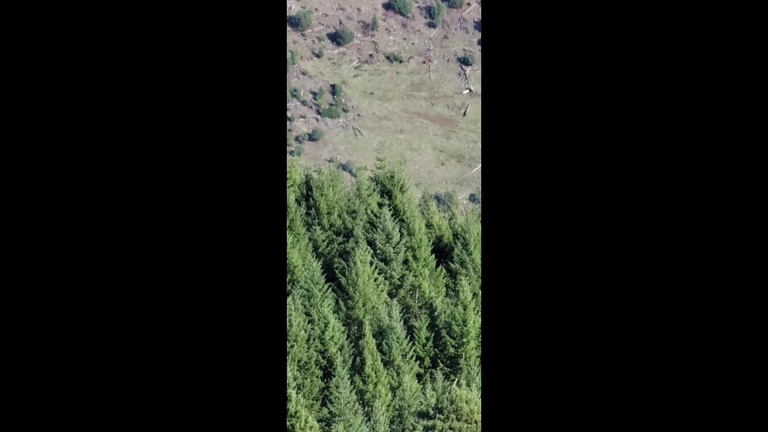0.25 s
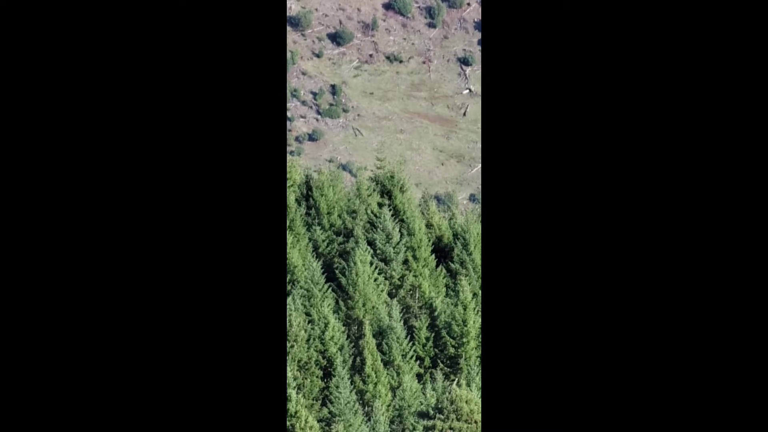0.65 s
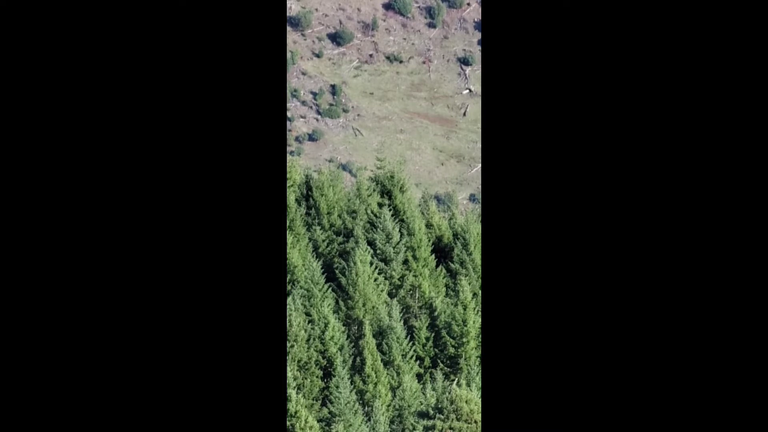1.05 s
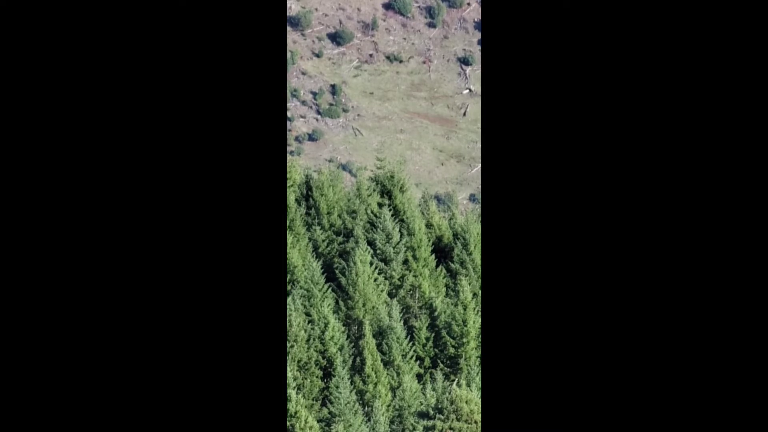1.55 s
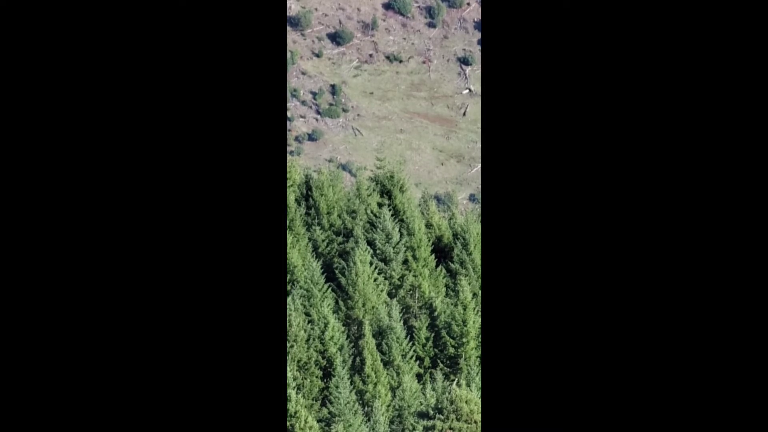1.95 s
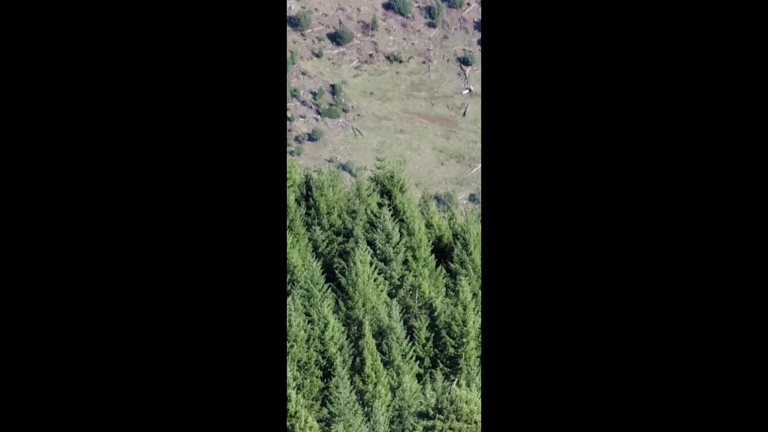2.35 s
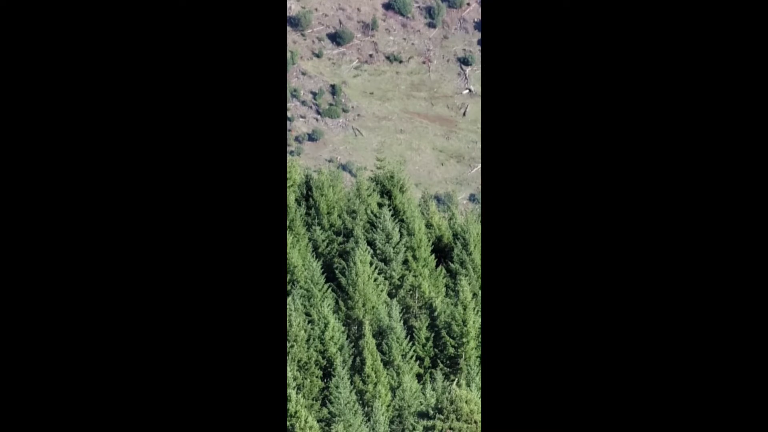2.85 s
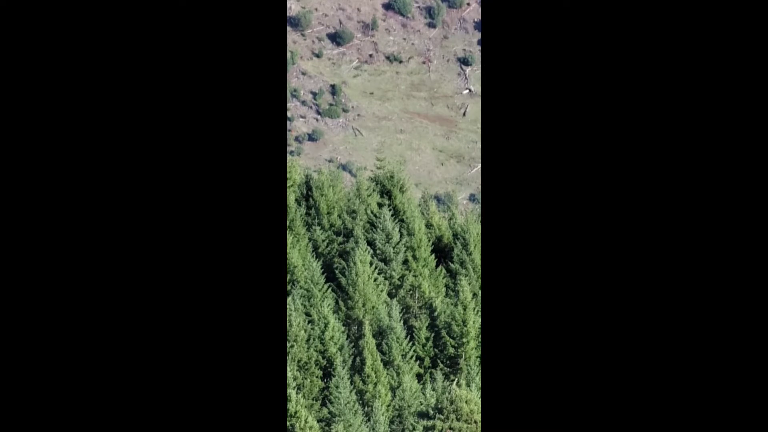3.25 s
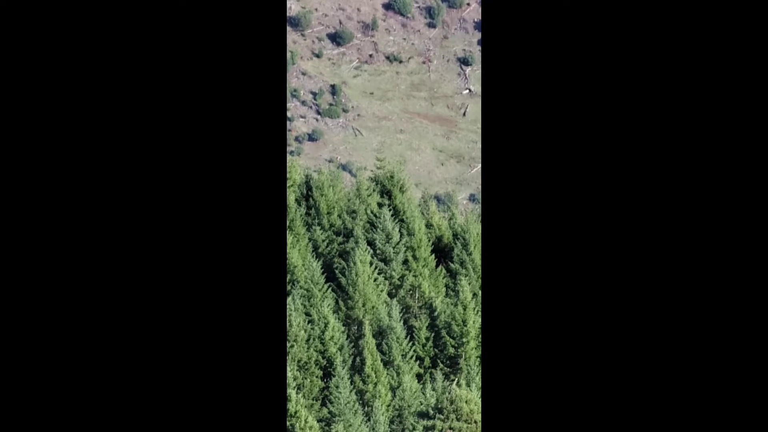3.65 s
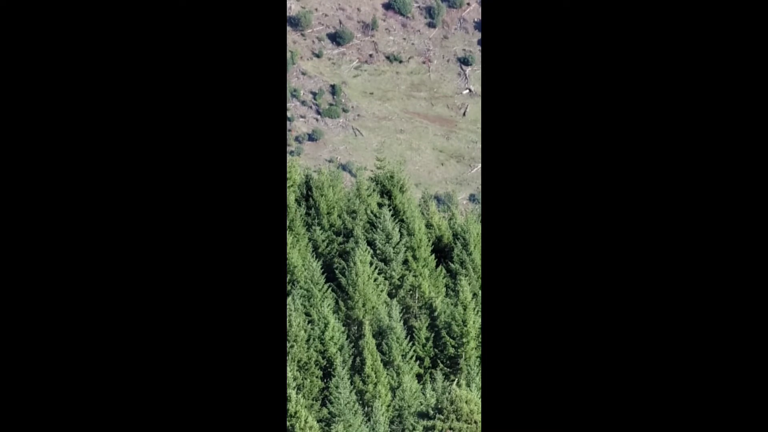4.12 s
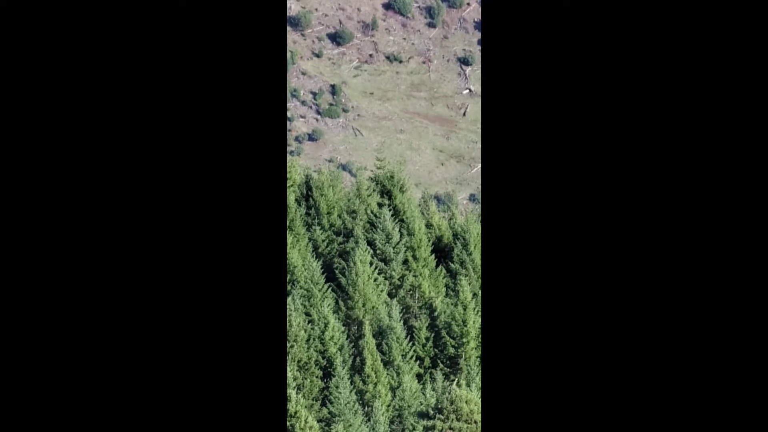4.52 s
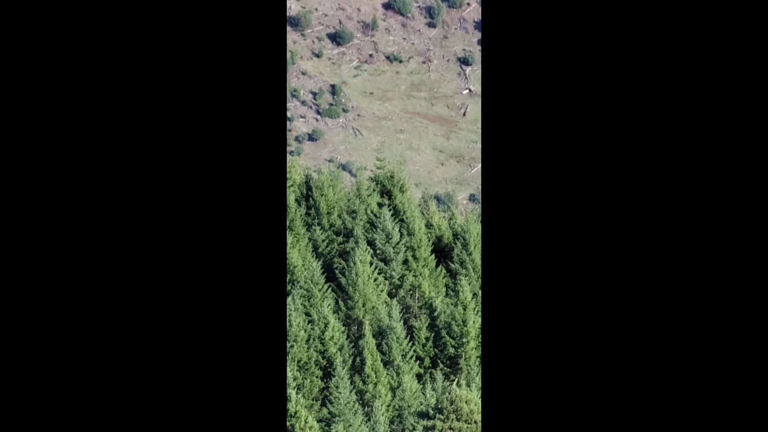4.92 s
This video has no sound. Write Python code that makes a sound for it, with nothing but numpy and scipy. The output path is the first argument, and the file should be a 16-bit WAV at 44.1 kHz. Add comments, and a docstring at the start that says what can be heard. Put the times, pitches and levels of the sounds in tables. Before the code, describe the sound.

For the first 1.7 seconds there is only very quiet valley air, a soft low rumble with faint hiss. At about 1.7 s a single rifle shot goes off close to the stereo microphones: a loud, rough, sizzling crack packed with dense pulses, low thumps and a deep push. Nearby ground and trees throw it back at once, with a second burst near 1.86-1.9 s, and the blast drops away by about 2.1 s. A grainy rolling echo takes over, with dull slaps around 2.3-2.5 s, smaller swells near 2.5 and 2.9 s, and a lull toward 3.5 s. From 3.7 s the far hillside answers more fully, a broad roar with sharper slaps clustered at 4.07-4.4 s, leaning slightly right. It grows duller and fades, with weak last slaps near 4.8-5.05 s. Barely audible dry ticks and thin rustling hiss sit close by after 4.1 s.

```python
"""Rifle shot above a wooded valley

One rifle shot close to the microphones: a rough blast of dense pulses with low thumps and a deep rumble,
thrown straight back by the nearest trees. Then countless trunks and slopes return it as a rolling echo of
scattered pulses, fullest from the far hillside, with single sharp slaps among it; the air dulls them with distance.
Close by, a faint rustle ticks and hisses late on, over the soft filtered noise of still air."""
import sys
import numpy as np
from scipy import signal
from scipy.fft import rfft, irfft, next_fast_len
from scipy.io import wavfile
from scipy.ndimage import uniform_filter1d

SR = 44100
rng = np.random.default_rng(int(sys.argv[2]) if len(sys.argv) > 2 else 0)


def transcribe(signal):
    """Save signal, clipped to [-1, 1], as a 16-bit WAV file at the path in sys.argv[1]."""
    frames = np.atleast_2d(signal).T
    limited = np.clip(frames, -1, 1)
    pcm = np.round(limited * 32767).astype(np.int16)
    wavfile.write(sys.argv[1], SR, pcm)


N = 228334
TIME = np.arange(N) / SR  # s
SIZE = next_fast_len(N)
BINS = np.maximum(np.arange(SIZE // 2 + 1) * SR / SIZE, 1)  # Hz
CENTRES = np.geomspace(25, 16000, 29)  # third octaves, Hz
SHOT_S = 1.707


# Colour of the report. Each row: frequency in Hz, relative level in dB.
REPORT_COLOUR = [(15, -51.5), (25, -6.5), (104, -5.5), (209, -4), (240, -6.5), (359, -7), (457, -13),
                 (537, -10), (970, -12), (1240, -15.5), (3000, -18.5), (4380, -20.5), (7910, -27.5),
                 (10900, -32.5), (15500, -27.5)]
# Narrow lifts in the report's uneven spectrum. Each row: frequency in Hz, width in Hz, lift in dB.
REPORT_LIFTS = [(109.7, 13, 5.5), (156.6, 14, 8.5), (205, 27, 4), (280, 9.1, 4.5), (353, 47, 4),
                (377, 16, 2), (671, 25, 1.5), (816, 53, 2), (975, 75.8, 5), (1860, 40.5, 3),
                (2780, 21.4, 9.5), (4840, 130, 4.5), (6460, 26, 2.5), (12900, 31, 4.5)]
# Left-right likeness of sounds close to the microphones. Each row: frequency in Hz, correlation (-1 to 1).
NEAR_LIKENESS = [(60, .65), (200, .75), (650, .76), (1400, .5), (3100, .15), (7000, .03), (15000, -.09)]
# The muzzle blast, then its returns from the ground close by, the nearest trees and the wood behind them.
# Each row: full at in seconds, hold in seconds, rise in dB per s, fall in dB per s before its share below,
# then boom, bark and crack levels in dB.
BURSTS = [(1.725, 0.017, 1096.5, 900, -21, -16, -18.5), (1.753, .016, 649.5, 300, -15, -21, -17.5),
          (1.859, 0.0072, 597.5, 454, -24.5, -15, -24), (1.890, 0.053, 240, 113.5, -27.5, -22, -32)]
# Timing of boom, bark and crack; the boom lasts longest.
# Each row: delay in seconds (positive starts later, negative earlier), share of the fall rate.
BURST_RANGES = [(-0.0037, .7), (0.00096, 0.86), (-0.0035, 1.09)]


def report(dulling_db_per_s=55, dull_from_s=1.816, boom_split_hz=400, crack_split_hz=3500,
           bass_edge_hz=100, bass_db=-5, sizzle_db=4, pan_db=-0.4):
    """The blast and its thick near reflections: dense pulses that start with a sizzle, then lose treble."""
    pulses = arrivals(per_s=1500, spread_db=4.5, diffuse=0.73)
    spectrum = stereo_spectrum(pulses, NEAR_LIKENESS) * near_reflections()
    lifts_db = sum(lift / (1 + (2 * (BINS - hz) / width) ** 2) for hz, width, lift in REPORT_LIFTS)
    shelf_db = bass_db / (1 + (BINS / bass_edge_hz) ** 4)  # the deepest part travels in the thumps
    spectrum = spectrum * from_db(at_hz(REPORT_COLOUR, BINS) + lifts_db + shelf_db)
    age = np.clip(TIME - dull_from_s, 0, .3)

    def treble_loss(hz):
        """Loss in dB, in proportion to frequency; the settings hold at 8 kHz."""
        return (dulling_db_per_s * age - sizzle_db) * hz / 8000

    levels_db = range_levels(BURSTS, BURST_RANGES)
    blast = play(spectrum, [boom_split_hz, crack_split_hz], levels_db, treble_loss, even_s=0.024)
    onset = np.clip((TIME - SHOT_S) / 0.0031, 0, 1)
    return blast * onset * panned(pan_db)


def near_reflections(count=14, spread_s=.03, strength=0.073):
    """Ground and objects within a few metres repeat the blast at once and comb its spectrum."""
    taps = np.zeros(SIZE)
    places = (rng.uniform(.1, 1, count) * spread_s * SR).astype(int)
    taps[places] = strength * rng.choice([-1, 1], count)
    return 1 + rfft(taps) * BINS / np.hypot(BINS, 700)  # small objects do not return long waves


def buffet(start_s=1.718, level_db=-16, swell_s=0.0088, low_hz=70, high_hz=500):
    """The push of the blast jolts each microphone port on its own."""
    band = signal.butter(2, [low_hz, high_hz], "band", fs=SR, output="sos")
    jolts = signal.sosfilt(band, rng.standard_normal((2, N)))
    age = np.clip((TIME - start_s) / swell_s, 0, 30)
    return from_db(level_db) * age * np.exp(1 - age) * jolts / jolts.std()


# The deep pressure wave and its returns from the slope.
# Each row: start in seconds, peak of the swell in dB, pitch in Hz, swell time in seconds.
THUMPS = [(1.729, -18.5, 74, 0.011), (1.768, -9.5, 101.6, 0.0074), (1.834, -13, 114, 0.0071),
          (1.883, -12.5, 84, 0.0084), (1.948, -20, 82.5, 0.0089)]


def thumps():
    """Each deep wave is a sine that swells and dies within a few cycles."""
    out = np.zeros(N)
    for s, peak_db, hz, swell_s in THUMPS:
        age = np.clip(TIME - s, 0, 30 * swell_s)
        envelope = age / swell_s * np.exp(1 - age / swell_s)
        out += from_db(peak_db) * envelope * np.sin(2 * np.pi * hz * age)
    return out


# The ground-hugging rumble of the shot and its one return.
# Each row: full at in seconds, hold in seconds, rise in dB per s, fall in dB per s, level in dB.
RUMBLES = [(1.716, 0.14, 3999.5, 79, -28.5), (2.291, .01, 71, 140.5, -46.5)]
# Colour of the rumble. Each row: frequency in Hz, relative level in dB.
RUMBLE_COLOUR = [(12, -29), (25, -8.5), (45, -2.5), (65, 7), (100, -7), (200, -31.5), (1000, -90)]


def deep_rumble():
    """The longest waves cling to the ground and outlast the crack."""
    level = sum(from_db(level_db) * swell(*shape) for *shape, level_db in RUMBLES)
    return level * coloured(rng.standard_normal((2, N)), RUMBLE_COLOUR)


# Colour of the echo before the air dulls it. Each row: frequency in Hz, relative level in dB.
ROLL_COLOUR = [(20, -44.5), (45, -33), (80, -6.5), (160, 5), (230, 1), (300, -4.5), (410, -6), (600, -4.5),
               (850, -4), (1300, -2), (2000, -3), (2800, -3.5), (3900, -11.5), (5400, -12), (9000, -18.5)]
# Left-right likeness of the distant echo. Each row: frequency in Hz, correlation (0 to 1).
FAR_LIKENESS = [(60, 1), (200, 0.97), (650, 0.95), (1400, 0.94), (3100, 0.28), (7000, 0.24)]
# Each slope of the valley sends back one swell of the echo, the far hillside the broadest.
# Each row: full at in seconds, hold in seconds, rise in dB per s, fall in dB per s before its share below,
# then rumble, roar and rush levels in dB.
SLOPES = [(2.12, 0.026, 200, 55.5, -38.5, -39.5, -38), (2.545, 0.079, 74, 70, -41, -40, -37),
          (2.77, 0.015, 78, 144, -39.5, -45, -61), (2.94, .06, 118, 80, -49.5, -45, -40.5),
          (3.16, 0.32, 38, 33.5, -45.5, -50, -40), (3.72, 0.15, 52, 57.5, -37.5, -35, -31.5),
          (4.05, .33, 31, 33, -37, -37.5, -32.5), (4.77, 0.024, 33.5, 30.5, -52, -41, -52.5)]
# Timing of rumble, roar and rush.
# Each row: delay in seconds (positive starts later), share of the fall rate.
SLOPE_RANGES = [(0, 0.95), (0.026, 1.08), (0, 0.84)]


def rolling_echo(start_s=2.042, rise_s=0.16, rumble_split_hz=300, rush_split_hz=1000,
                 pan_db=-0.95, left_lag_s=.00005):
    """Trees and slopes each send back a small copy of the shot, a little from the right."""
    pulses = arrivals(per_s=1100, spread_db=1.5, diffuse=1.07)
    spectrum = stereo_spectrum(pulses, FAR_LIKENESS) * from_db(at_hz(ROLL_COLOUR, BINS))
    spectrum = spectrum * np.exp(-2j * np.pi * BINS * np.array([[left_lag_s], [0]]))
    levels_db = range_levels(SLOPES, SLOPE_RANGES)
    roll = play(spectrum, [rumble_split_hz, rush_split_hz], levels_db,
                lambda hz: path_loss(hz, TIME), even_s=0.1)
    onset = np.clip((TIME - start_s) / rise_s, 0, 1)
    return roll * clumps() * onset * panned(pan_db)


def clumps(depth_db=1.21, length_s=.022):
    """Trees stand in groups, so their returns bunch: a gain that wavers at random."""
    wander = rng.standard_normal(N)
    for _ in range(2):
        wander = uniform_filter1d(wander, size=int(length_s * SR))
    return from_db(depth_db * wander / wander.std())


# Single returns from large faces of the terrain.
# Each row: middle of the wave in seconds, its peak in dB before panning, pulse length in ms, pan in dB to the left.
SLAPS = [(2.304, -31, 4, 0), (2.339, -28, 3, -1.5), (2.358, -23, 2.6, -2), (2.391, -35, 2.5, 0),
         (2.437, -27, 2, 1.5), (2.477, -27, 2, -.5), (2.679, -33, 2, -.5), (2.969, -21, .6, .5),
         (3.714, -21, .7, -1), (4.074, -14, .55, -1), (4.101, -16, .9, -1), (4.231, -17, .7, -1),
         (4.239, -18, .7, -1), (4.272, -21, .6, -1.5), (4.394, -22, 1.1, -1), (4.825, -30, 1.1, 0),
         (4.925, -30, 1.4, -1), (5.048, -29, 1.1, -.5)]


def slaps(splash_db=-14, splash_pulse_lengths=2.2, splash_edge_hz=3000):
    """A large face returns an N-shaped wave in a short splash of scattered sound, dulled by the air."""
    out, local = np.zeros((2, N)), np.arange(-2048, 2048) / SR
    hz = np.maximum(np.arange(len(local) // 2 + 1) * SR / len(local), 1)
    for s, peak_db, length_ms, pan_db in SLAPS:
        phase = 2000 * local / length_ms  # -1 to 1 across the pulse
        air = from_db(-path_loss(hz, s))
        wave = irfft(rfft(phase * (abs(phase) < 1)) * air)
        fade = (phase > -1) * np.exp(-abs(phase) / (2 * splash_pulse_lengths))
        scattered = rfft(fade * rng.standard_normal(len(local)))
        splash = irfft(scattered * air / np.hypot(hz, splash_edge_hz))
        slap = wave / abs(wave).max() + from_db(splash_db) * splash * fade.std() / splash.std()
        start = round(s * SR) - len(local) // 2
        out[:, start:start + len(local)] += slap * from_db(peak_db) * panned(pan_db)
    return out


# Sound skimming the ground cancels in a band of the low middle.
# Each row: arrival in seconds, depth in dB (negative lifts the band).
GROUND_DIP = [(2.1, -5), (2.8, -1), (3.2, -1), (3.8, 12.5), (4.3, 6), (4.8, 2.5)]
GROUND_DIP_HZ, GROUND_DIP_OCTAVES = 386, 0.68
# The longer the path, the lower the air's treble edge.
AIR_EDGE_HZ, AIR_SINK_OCTAVES_PER_S = 4440, 0.62


def path_loss(hz, s):
    """Loss in dB of an echo arriving at time s: the air takes the treble, the ground alters a low band."""
    edge_hz = AIR_EDGE_HZ * 2 ** (-AIR_SINK_OCTAVES_PER_S * (s - SHOT_S))
    dip_db = np.interp(s, *np.transpose(GROUND_DIP))
    air_db = np.minimum(4.3 * (hz / edge_hz) ** 2, 120)
    return air_db + dip_db * np.exp(-(np.log2(hz / GROUND_DIP_HZ) / GROUND_DIP_OCTAVES) ** 2)


# Small dry ticks close by. Each row: start in seconds, level in dB before the common tick_db.
TICKS = [(4.128, -64), (4.3624, -64.5), (4.539, -69.5), (5.0756, -69.5), (5.111, -64)]
# Colour of the rustle. Each row: frequency in Hz, relative level in dB.
RUSTLE_COLOUR = [(1500, -4.5), (4500, 2), (6200, -2.5), (7400, 4.5), (8800, -12.5), (15000, -5)]


def rustle(start_s=4.44, start_db=-85, growth_db_per_s=7, tick_s=0.00276, tick_db=-8):
    """Tiny ticks and a thin, slowly growing hiss close by, as of cloth or dry grass."""
    hiss = from_db(start_db + growth_db_per_s * (TIME - start_s)) * (TIME >= start_s)
    ticks = 0
    for s, level_db in TICKS:
        decay = np.exp(-np.minimum(abs(TIME - s) / tick_s, 20))
        ticks = ticks + from_db(level_db + tick_db) * (TIME >= s) * decay
    grains = arrivals(per_s=60, spread_db=1.5, diffuse=3.4)
    return (hiss + ticks) * coloured(grains, RUSTLE_COLOUR)


# Still air over the valley. Each row: frequency in Hz, relative level in dB.
AIR = [(25, -14), (80, 0), (120, -9), (170, -25.5), (350, -25), (450, -27.5), (900, -26), (1300, -25.5),
       (1600, -31.5), (3000, -34.5), (6000, -46), (9500, -53.5), (13000, -38.5), (15500, -41)]


def still_air(level_db=-64.5):
    """A soft low rumble and a faint hiss of the forest, from steady filtered noise."""
    return from_db(level_db) * coloured(rng.standard_normal((2, N)), AIR)


def arrivals(per_s, spread_db, diffuse):
    """Two unrelated streams of small pulses of uneven size, on a diffuse bed of noise."""
    loudness_db = spread_db * np.clip(rng.standard_normal((2, N)), -2, 2)
    sizes = from_db(loudness_db) * rng.choice([-1, 1], (2, N))
    clicks = sizes * (rng.random((2, N)) < per_s / SR)
    return clicks / clicks.std() + diffuse * rng.standard_normal((2, N))


def stereo_spectrum(streams, likeness):
    """Long waves reach both microphones alike, short ones differ."""
    mid, side = rfft(streams, SIZE)
    alike = np.clip(at_hz(likeness, BINS), -.99, .99)
    return np.sqrt(1 + alike) * mid + np.sqrt(1 - alike) * side * [[1], [-1]]


def coloured(streams, colour):
    """Two streams made into a nearby stereo sound of the given colour; the channel mean has rms 1."""
    spectrum = stereo_spectrum(streams, NEAR_LIKENESS) * from_db(at_hz(colour, BINS))
    sound = irfft(spectrum, SIZE)[:, :N]
    return sound / sound.mean(0).std()


def play(spectrum, splits_hz, levels_db, loss_db, even_s):
    """Dull each third octave by loss_db(Hz), then hold the low, middle and high range at their levels."""
    out, ranges = 0, np.searchsorted(splits_hz, CENTRES)
    for k, level_db in enumerate(levels_db):
        part = 0
        for hz in CENTRES[ranges == k]:
            window = np.interp(np.log(BINS), np.log(CENTRES), 1. * (CENTRES == hz))
            part = part + from_db(-loss_db(hz)) * irfft(spectrum * window, SIZE)[:, :N]
        power = part.mean(0) ** 2
        for _ in range(2):  # grain shorter than even_s stays free
            power = uniform_filter1d(power, size=int(even_s * SR))
        out = out + part * from_db(level_db) / np.sqrt(abs(power) + 1e-20)
    return out


def range_levels(returns, ranges):
    """Level in dB of the low, middle and high range: the swells of all returns add in power."""
    levels_db = []
    for k, (delay_s, fall_share) in enumerate(ranges):
        power = 0
        for s, hold_s, rise, fall, *range_db in returns:
            gain = from_db(range_db[k]) * swell(s + delay_s, hold_s, rise, fall * fall_share)
            power = power + gain ** 2
        levels_db.append(10 * np.log10(power))
    return levels_db


def swell(full_s, hold_s, rise_db_per_s, fall_db_per_s):
    """Gain that rises to one, holds and dies away."""
    age = TIME - full_s
    slope_db = np.minimum(rise_db_per_s * age, fall_db_per_s * (hold_s - age))
    return from_db(np.clip(slope_db, -150, 0))


def from_db(db):
    """Decibels to gain."""
    return 10 ** (np.asarray(db) / 20)


def at_hz(points, hz):
    """Read a table on a log-frequency axis."""
    known_hz, values = np.transpose(points)
    return np.interp(np.log(hz), np.log(known_hz), values)


def panned(pan_db):
    """Left and right gains that differ by pan_db; positive favours the left."""
    return from_db(np.array([[.5], [-.5]]) * pan_db)


def scene():
    """The shot, its echoes and the quiet around them."""
    shot = report() + buffet() + thumps() + deep_rumble()
    return shot + rolling_echo() + slaps() + rustle() + still_air()


def record(dry, cutoff_hz=15800):
    """The highest peaks are rounded off and the top is cut."""
    rounded = dry / (1 + dry ** 6) ** (1 / 6)
    top_cut = signal.ellip(12, .1, 80, cutoff_hz, fs=SR, output="sos")
    return signal.sosfilt(top_cut, rounded)


dry = scene()
out = record(dry)
transcribe(out)
```